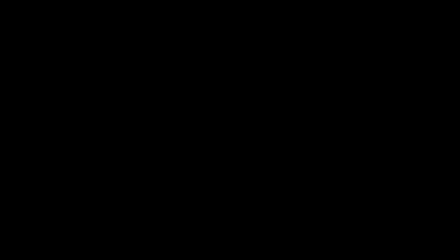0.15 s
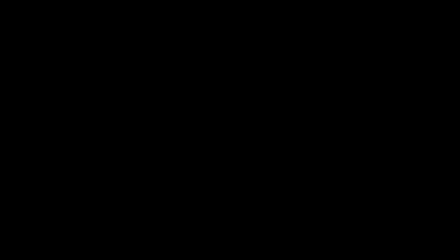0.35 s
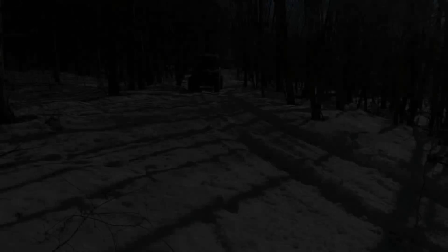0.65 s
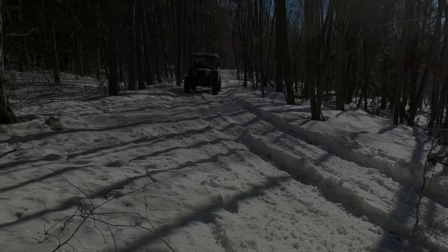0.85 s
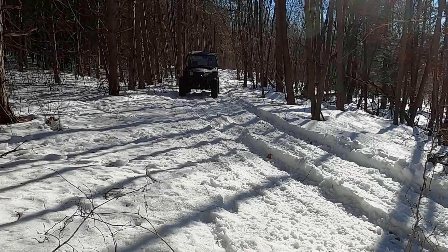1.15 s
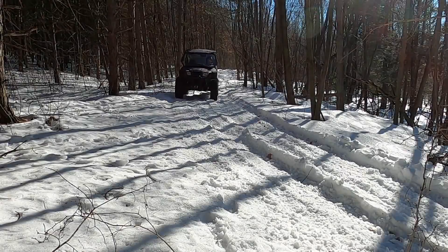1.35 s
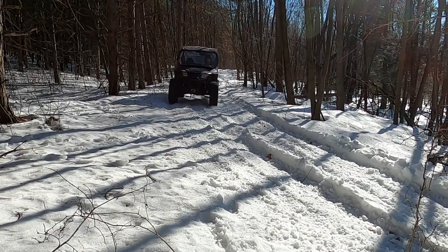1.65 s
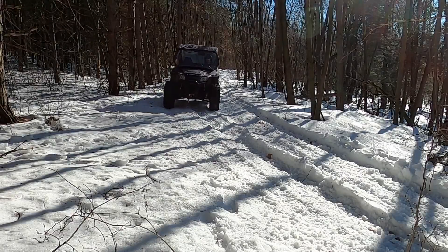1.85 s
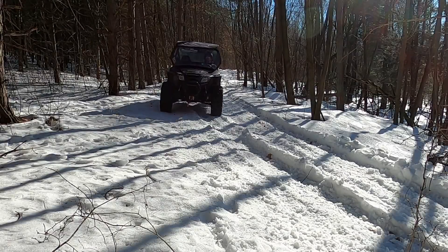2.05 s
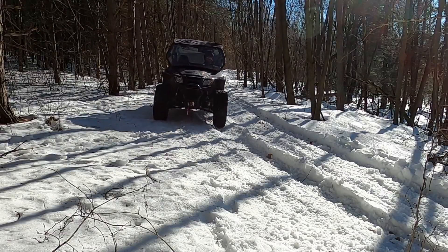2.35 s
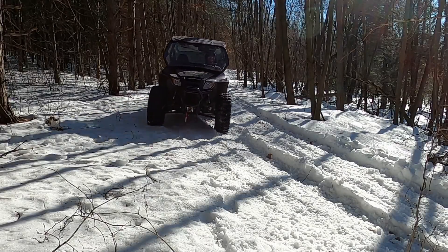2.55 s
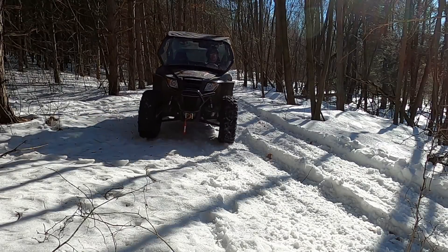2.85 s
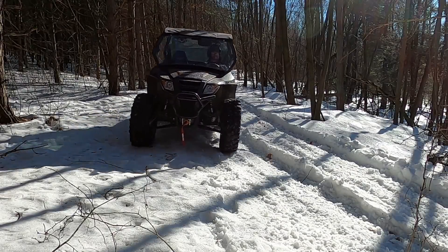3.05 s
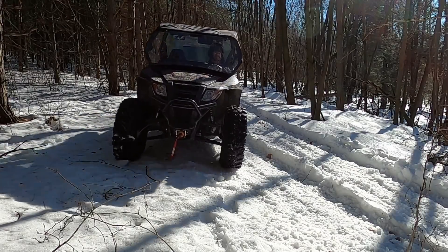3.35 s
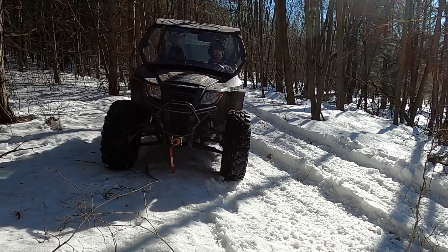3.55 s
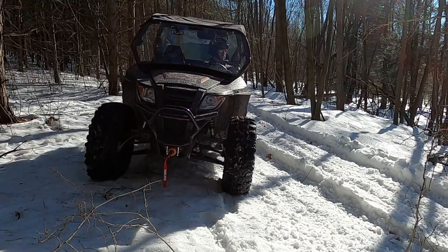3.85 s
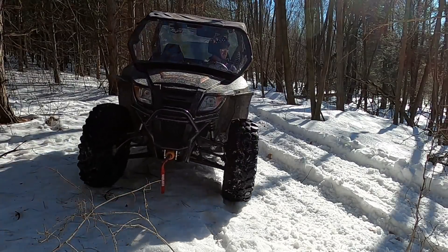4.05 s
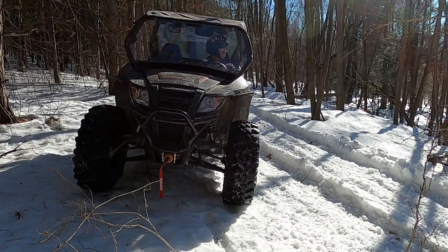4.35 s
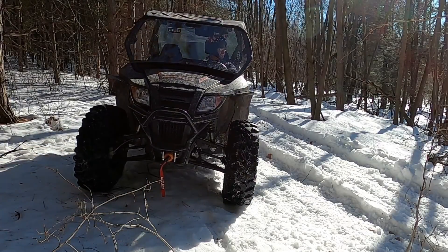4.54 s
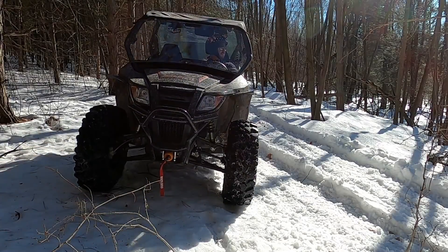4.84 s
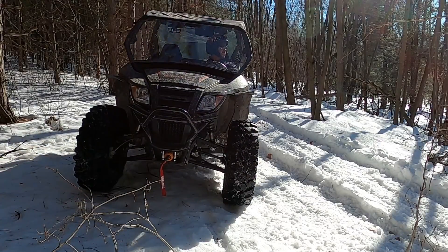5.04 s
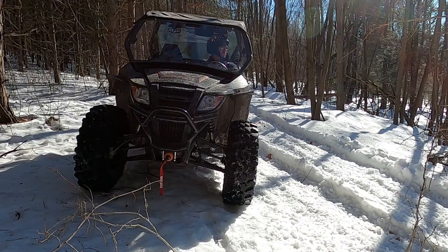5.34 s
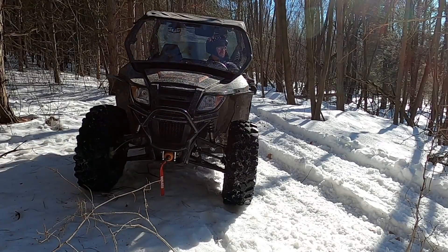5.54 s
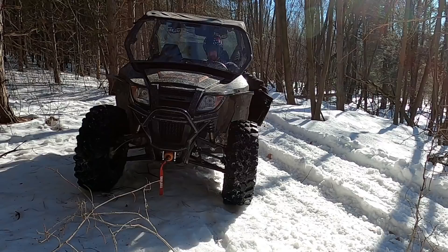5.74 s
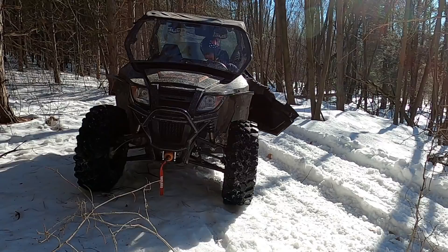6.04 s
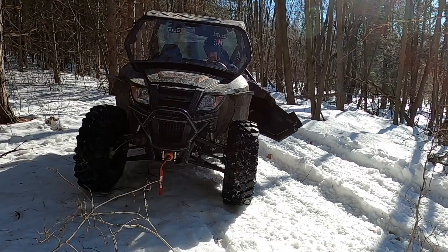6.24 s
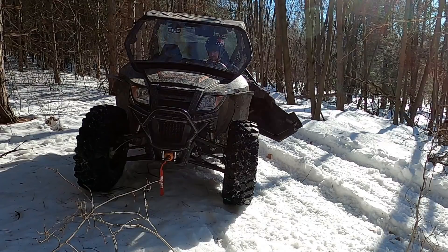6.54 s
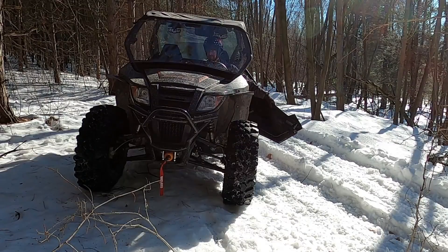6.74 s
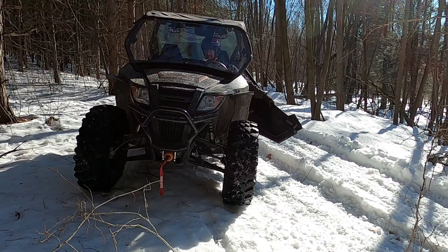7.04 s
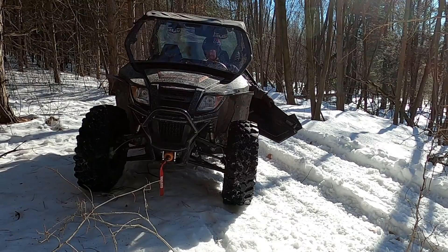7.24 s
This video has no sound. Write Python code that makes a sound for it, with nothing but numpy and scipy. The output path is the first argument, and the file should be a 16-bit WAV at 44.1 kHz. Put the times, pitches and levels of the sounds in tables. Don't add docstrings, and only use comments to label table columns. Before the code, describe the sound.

A two-cylinder off-road vehicle fades in with a fast, low exhaust drone, rolling toward a small fixed microphone on a snowy forest track. Revs drop, snow crunches and crust snaps, exhaust pops burst out as throttle returns. It stops close by and idles in separate, uneven thumps with valve clatter, while a gear lever knocks and a door latch clacks. Bright sounds echo faintly off trees.

```python
import sys
import numpy as np
from scipy import signal
from scipy.fft import rfft, irfft
from scipy.io import wavfile
from scipy.ndimage import uniform_filter1d

SR = 44100
rng = np.random.default_rng(int(sys.argv[2]) if len(sys.argv) > 2 else 0)


def convert_level_to_amplitude(level_db):
    exponent = np.asarray(level_db, float) / 20
    return 10 ** exponent


def waveform_to_disk(signal):
    frames = np.transpose(np.atleast_2d(signal))
    scaled = np.clip(frames, -1, 1) * 32767
    samples = np.round(scaled).astype(np.int16)
    wavfile.write(sys.argv[1], SR, samples)


N = 325899
T = np.arange(N) / SR

# [t/s, firing pairs/(1/s)]
ENGINE_SPEED = [(0.0, 64.42), (0.88, 65.06), (1.06, 67.6), (1.6, 65.23), (1.85, 52.83), (2.28, 44.03),
                (2.75, 34.55), (2.77, 39.45), (3.04, 39.23), (3.54, 35.92), (4.02, 24.29), (4.31, 21.97),
                (4.67, 23.62), (5.13, 22.47), (5.56, 23.78), (6.05, 22.65), (6.65, 23.09), (7.39, 22.6)]
# [t/s, opening 0-1]
THROTTLE = [(0, 0.54), (.8, 0.86), (1.1, 0.48), (1.55, 0.65), (1.75, .02), (2.5, 0.3), (2.8, 0.79),
            (3.1, 0.99), (3.5, 0.96), (3.9, 0.42), (4.4, 0.31), (7.39, 0.29)]
# [t/s, distance/m]
DISTANCE = [(0, 66), (1.6, 29.5), (2.3, 4.2), (3, 3), (4.1, 4.72), (7.39, 3.8)]
# [f/Hz, level/dB]
SILENCER = [(35, -24), (52, -22), (68, -24.5), (105, -24.5), (131, -17.5), (154, -36.5), (197, -23.5),
            (260, -50.5)]
# [multiple, level/dB, gain at full throttle/dB]
LOW_ORDERS = [(1, 2.2, -2.5), (2, 3.04, -5), (3, -6.5, -4.5), (4, -15.5, 24.5)]
# [multiple, level/dB]
UPPER_ORDERS = [(5, -1.5), (6, -10), (7, -11.5), (8, -3), (9, -7), (10, -6.5), (11, -8), (12, -10)]
# [f/Hz, level/dB]
BLOCK_COLOUR = [(160, -3), (280, -6.5), (343, -9), (419, -6.5), (570, -4.5), (729, -17.5), (806, -23),
                (1250, -30.5), (1610, -31.5), (1810, -36), (2140, -31.5), (2700, -40), (5950, -50.5),
                (15500, -76)]
# [f/Hz, width/Hz, level/dB]
COVERS = [(880, 19, -3.5), (1590, 36, -0.5), (1980, 150, -12.5), (3600, 160, -16.5), (4120, 90, -18.5)]
# [t/s, crunch/dB, chassis jolt/dB, half length/s]
RUTS = [(0.18, 4, -5, 0.21), (2.287, -2, -11, 0.14), (0.637, 4, 10.5, 0.11), (1.075, 2, 7.5, 0.13),
        (1.48, 2.5, 3.5, 0.19), (1.787, 7.5, 5.5, 0.058), (1.949, 5, -2, 0.056), (2.44, 2.5, 3, 0.027),
        (2.602, 4, 8.5, 0.019), (2.77, 2, 1, 0.053), (3.028, 2, -0.5, 0.079), (3.4, 2, 3.5, 0.14),
        (3.553, 7, 2, 0.017), (3.599, 5, 19, 0.035), (3.868, 6.5, -2, 0.02), (4.19, 0, 4, 0.027)]
# [f/Hz, level/dB]
SNOW_COLOUR = [(190, -34.5), (320, -1.5), (496, -6.5), (556, -2), (781, -8.5), (1030, -6), (1340, -9.5),
               (1620, -7), (2730, -11), (3710, -13), (7960, -23.5), (9990, -29.5), (11400, -39),
               (12500, -34), (15500, -49)]
# [t/s, peak level/dB, centre f/Hz]
SNAPS = [(1.77, -18.5, 2430), (1.7974, -30, 1100), (2.587, -33, 1900), (2.6943, -28.5, 1680),
         (2.978, -21.5, 2200), (3.023, -21.5, 2160), (3.057, -30, 1680), (3.1076, -24.5, 980),
         (2.039, -27.5, 653), (1.09, -28.5, 560), (.965, -29.5, 520), (1.2, -30, 560), (2.6, -28, 600),
         (3.1448, -36, 1900), (3.5553, -15.5, 2050), (3.5647, -25.5, 2010), (3.5998, -24, 1090),
         (3.6064, -41, 947), (3.6188, -27.5, 1510), (3.09, -30, 2000), (4.3266, -31.5, 1060),
         (4.3505, -35.5, 964), (4.3824, -45, 920)]
# [f/Hz, t60/s, swing from first cylinder, swing from second]
PIPE_MODES = [(38.4, 0.12, 0.082, 0.17), (69.4, 0.06, -0.45, -0.32), (129.4, 0.18, 0.19, 0.11),
              (152.9, 0.13, -0.087, -0.041), (175.3, 0.041, 0.17, -0.032), (241.3, 0.078, 0.0032, 0.0023),
              (254.6, 0.023, 0.038, .008), (365, 0.015, 0.0024, 0.031), (390, 0.021, -0.026, -0.00067)]
# [t/s, level/dB]
POPS = [
    (2.704, -6),
    (2.754, -2),
    (2.777, -10),
    (2.831, -10.5),
    (2.981, -5.5),
    (3.739, -4.5),
]
# [t/s, share of the blow left]
MISSES = [(3.927, .02), (4.173, .05), (5.045, 0.16), (5.223, 0.24), (5.567, .4), (5.694, 0.21),
          (5.865, 0.2), (6.041, 0.42), (6.348, 0.097), (6.523, 0.19), (6.695, 0.16), (7.35, 0.5)]
# [t/s, peak level/dB]
LEVER_KNOCKS = [
    (4.311, -24),
    (4.581, -36),
    (4.746, -47.5),
]
# [f/Hz, level/dB, t60/s]
LEVER_MODES = [(430, -3, .07), (600, -3, .06), (760, 0, .04), (880, -1, .035), (1030, -1, .035),
               (1200, -5, .03)]
# [t/s, peak level/dB, low thud/dB, handle share against striker, brightest f/Hz]
LATCH_CLACKS = [
    (5.266, -48.5, 0, .6, 4590),
    (5.348, -31, -1.5, 0.7, 3270),
    (5.518, -66, -14, 0.84, 6600),
    (5.744, -47, -31, 0.089, 7400),
    (5.771, -31, -15, 0.079, 3810),
    (6.192, -52.5, 6.5, .3, 2200),
    (6.6, -57, -1, 0.44, 4000),
    (6.808, -46.5, -2.5, 0.21, 2470),
]
# [f/Hz, level/dB]
DOOR_COLOUR = [(470, -33), (800, 2), (1180, -7.5), (2410, -7), (2790, -14), (3490, -1), (4910, -15.5),
               (8640, -28.5), (15000, -52)]
# [f/Hz, width/Hz, level/dB]
HANDLE = [(1550, 700, 9), (2950, 1200, 5.5), (3660, 160, 5.5), (7140, 520, 3), (7600, 300, 5.5),
          (8510, 200, 12.5), (12000, 900, 0)]
# [f/Hz, width/Hz, level/dB]
STRIKER = [(1400, 760, 6.5), (2200, 330, 13), (3100, 900, -1.5), (4060, 300, 2.5), (5560, 1200, 0.5),
           (8200, 900, -10.5)]

START_PAIRS = 0.29
ORDERS_DB, UPPER_DB, UPPER_LOAD_DB, WAVER_DB = -2, -53, 10.5, 0.8
SMEAR = 0.45
LOPE_SHUT, LOPE_OPEN, THIRD_LAG = 0.9, 3.4, 0.9
BLOW_LOAD_DB, SHARP_LOAD_DB, EVENING = -1, 8.5, 0.25
IDLE_DB, SECOND_SHARE, IDLE_FROM_S, SETTLE_S = -19, 0.94, 3.58, 0.072
BLOCK_DB, BLOCK_LOAD_DB = -47.5, 5
RUMBLE_DB, RUMBLE_NEAR = -36.5, 0.2
CRUNCH_DB, CRUNCH_NEAR, STOP_S, SKID_S = -48, 0.017, 4.498, 0.32
NEAR_M, AIR_DB_PER_OCTAVE_M = 8.6, 0.04
RATTLE_T60_S = 0.27
FADE_LEAD_S, FADE_S = 0.21, 1.416


def evened(x):
    return x / np.sqrt(np.mean(x ** 2) + 1e-20)


def curve(rows):
    rows = np.array(rows)
    return np.interp(T, rows[:, 0], rows[:, 1])


def add(mix, s, sound):
    part = mix[round(s * SR):][:len(sound)]
    part += sound[:len(part)]


def coloured(x, points):
    f, db = np.transpose(points)
    hz = np.fft.rfftfreq(len(x), 1 / SR)
    gain_db = np.interp(np.log(hz + 1), np.log(f + 1), db)
    return irfft(rfft(x) * convert_level_to_amplitude(gain_db), len(x))


def ring(hz, t60, size=8000):
    t = np.arange(size) / SR
    return convert_level_to_amplitude(-60 * t / t60) * np.sin(2 * np.pi * hz * t)


def resonate(x, hz, width):
    return signal.lfilter(*signal.iirpeak(hz, hz / width, SR), x)


def resonate_twice(x, hz, width):
    return resonate(resonate(x, hz, width), hz, width)


def drift(seconds):
    size = round(seconds * SR)
    return evened(uniform_filter1d(uniform_filter1d(rng.standard_normal(N), size), size))


def nearness():
    return 20 * np.log10(DISTANCE[-1][1] / curve(DISTANCE))


def ruts(column):
    return sum(row[column] * np.exp(-((T - row[0]) / row[3]) ** 2) for row in RUTS)


def rolling():
    return np.clip((STOP_S - T) / SKID_S, 0, 1)


def idling():
    return np.clip((T - IDLE_FROM_S) / SETTLE_S, 0, 1)


def crank():
    return START_PAIRS + np.cumsum(curve(ENGINE_SPEED)) / SR


def crank_orders(pairs):
    angle, hz, load = 2 * np.pi * (pairs - 0.5), curve(ENGINE_SPEED), curve(THROTTLE)
    f, through = np.transpose(SILENCER)
    lope = LOPE_SHUT + (LOPE_OPEN - LOPE_SHUT) * np.sqrt(load)
    low = 0
    for (k, db, load_db), shift in zip(LOW_ORDERS, [lope, 0, -THIRD_LAG, 0]):
        silencer_db = np.interp(np.log(k * hz), np.log(f), through)
        level_db = db + load * load_db + silencer_db + WAVER_DB * drift(0.012)
        low = low + convert_level_to_amplitude(level_db) * np.cos(k * angle + shift)
    high = 0
    for k, db in UPPER_ORDERS:
        silencer_db = -np.clip(k * hz - 540, 0, None) / 14
        level_db = db * (1 - EVENING * load ** 2) + silencer_db + 4 * (1 - load) * drift(0.05)
        high = high + convert_level_to_amplitude(level_db) * np.cos(k * angle - SMEAR * k ** 2)
    whine = np.clip((hz - 56) / 6, 0, 1) * convert_level_to_amplitude(-12 + 3 * drift(0.04))
    whine = whine * np.cos(16 * angle + 1.3 * drift(0.015))
    settling = np.clip((4.25 - T) / 0.17, 0, 1)
    low = (1 - idling()) * convert_level_to_amplitude(ORDERS_DB) * low
    high = settling * convert_level_to_amplitude(UPPER_DB + UPPER_LOAD_DB * load) * (high + whine)
    return np.sqrt(2) * (low + high)


def block(pairs):
    puff = 0.57 + uniform_filter1d(np.exp(-((pairs - 0.3) % 1) / 1.2), size=200)
    ticks = 1 + 0.35 * np.exp(-((4 * pairs) % 1) / 0.11) + 0.083 * puff
    air = convert_level_to_amplitude(1.1 * drift(0.032)) * rng.standard_normal(N)
    low = signal.sosfilt(signal.butter(2, 600, fs=SR, output="sos"), evened(puff * air))
    high = signal.sosfilt(signal.butter(2, 600, "high", fs=SR, output="sos"), evened(ticks * air))
    body = coloured(low + high, BLOCK_COLOUR)
    body /= np.std(resonate(body, 450, 320))
    covers = sum(convert_level_to_amplitude(db + 5.8 * drift(0.04)) * resonate(high, hz, width) for hz, width, db in COVERS)
    level_db = BLOCK_DB + nearness() + BLOCK_LOAD_DB * curve(THROTTLE)
    return convert_level_to_amplitude(level_db) * (body + convert_level_to_amplitude(-6.0) * covers)


def chassis():
    colour = [(14, -32), (32, 2), (150, 4.5), (250, -2), (400, -61)]
    rumble = evened(coloured(rng.standard_normal(N), colour))
    return convert_level_to_amplitude(RUMBLE_DB + RUMBLE_NEAR * nearness() + ruts(column=2)) * rolling() * rumble


def tyres():
    clumps = convert_level_to_amplitude(1.17 * drift(0.012))
    struck = rng.random(N) < 2500 / SR
    strength = convert_level_to_amplitude(3.0 * np.minimum(rng.exponential(1, N), 5))
    breaks = struck * strength * rng.choice([-1, 1], N)
    hiss = rng.standard_normal(N)
    crunch = coloured(clumps * (0.53 * evened(breaks) + 0.93 * hiss), SNOW_COLOUR)
    band = signal.sosfilt(signal.butter(2, [1500, 9000], "band", fs=SR, output="sos"), crunch)
    hz, t, z = signal.stft(crunch / np.std(band), SR, nperseg=512)
    octaves = np.log2(np.clip(hz, 700, None) / 2500)[:, None]
    tilt_db = AIR_DB_PER_OCTAVE_M * (NEAR_M - np.interp(t, *np.transpose(DISTANCE))) * octaves
    out = signal.istft(z * convert_level_to_amplitude(tilt_db), SR, nperseg=512)[1][:N]
    return out * convert_level_to_amplitude(CRUNCH_DB + CRUNCH_NEAR * nearness() + ruts(column=1)) * rolling()


def forest(x):
    taps = np.zeros(SR // 2)
    at = np.arange(500, len(taps) - 30, 30)
    taps[at + rng.integers(0, 30, len(at))] = rng.choice([-1., 1.], len(at))
    taps *= convert_level_to_amplitude(-60 * np.arange(len(taps)) / SR / 0.35)
    return signal.oaconvolve(x, taps / np.linalg.norm(taps))[:N]


def snaps():
    out, t = np.zeros(N), np.arange(2000) / SR
    envelope = np.minimum(t / 0.00063, 1) * convert_level_to_amplitude(-60 * t / 0.022)
    for s, db, hz in SNAPS:
        noise = rng.standard_normal(len(t))
        grit = resonate_twice(noise, 3300, 5000)
        snap = (resonate_twice(noise, hz, 900) + 0.22 * grit) * envelope
        add(out, s, convert_level_to_amplitude(db - 6.5) * snap / abs(snap).max())
    return out


def pops():
    out = np.zeros(N)
    pop = sum(swing * ring(hz, 0.5 * t60) for hz, t60, swing, _ in PIPE_MODES)
    for s, db in POPS:
        add(out, s, convert_level_to_amplitude(db) * pop)
    return out


def idle_blows(pairs):
    uneven, load = 1 + 0.12 * rng.standard_normal((2, N)), curve(THROTTLE)
    first = np.diff(np.floor(pairs - 0.272), prepend=-1) * uneven[0]
    second = np.diff(np.floor(pairs - 0.75), prepend=-1) * uneven[1]
    second = second * (SECOND_SHARE + (1 - SECOND_SHARE) * load)
    for s, left in MISSES:
        first = first * np.where(abs(T - s) < 0.014, left, 1)
    sharp, out = convert_level_to_amplitude(SHARP_LOAD_DB * load), 0
    for hz, t60, swing, swing_second in PIPE_MODES:
        drive = (swing * first + swing_second * second) * (sharp if hz > 100 else 1)
        out = out + signal.oaconvolve(drive, ring(hz, t60, size=16000))[:N]
    out = uniform_filter1d(out, size=70)
    level = np.sqrt(uniform_filter1d(uniform_filter1d(out ** 2, size=16000), size=16000))
    return idling() * convert_level_to_amplitude(IDLE_DB + BLOW_LOAD_DB * load) * out / level


def gear_lever():
    out, t = np.zeros(N), np.arange(8000) / SR
    for s, db in LEVER_KNOCKS:
        tune = rng.uniform(0.88, 1.037, len(LEVER_MODES))
        knock = sum(convert_level_to_amplitude(d) * ring(f * k, t60) for (f, d, t60), k in zip(LEVER_MODES, tune))
        add(out, s, convert_level_to_amplitude(db - 4.5) * np.minimum(t / 0.0013, 1) * knock)
    return out


def door_latch():
    out, t = np.zeros(N), np.arange(8000) / SR
    thud = ring(587, 0.07) + 0.7 * ring(450, 0.07) + 0.6 * ring(780, 0.04) + 0.4 * ring(1000, 0.03)
    for s, db, thud_db, share, hz in LATCH_CLACKS:
        tail = 0.12 * convert_level_to_amplitude(-60 * t / (RATTLE_T60_S * max(share, 0.2)))
        shake = rng.standard_normal(len(t)) * np.minimum(t / 0.006, 1) * (convert_level_to_amplitude(-60 * t / 0.06) + tail)
        handle = sum(convert_level_to_amplitude(d) * resonate(shake, f, w) for f, w, d in HANDLE)
        striker = sum(convert_level_to_amplitude(d) * resonate(shake, f, w) for f, w, d in STRIKER)
        clack = share * handle + (1 - share) * striker + 0.42 * coloured(shake, DOOR_COLOUR)
        clack = resonate_twice(clack, hz, 1.4 * hz)
        add(out, s, convert_level_to_amplitude(db) * clack / abs(clack).max())
        add(out, s + 0.006, convert_level_to_amplitude(db + thud_db) * thud)
    return out


def scene():
    pairs = crank()
    engine = crank_orders(pairs) + block(pairs) + pops() + idle_blows(pairs)
    bright = tyres() + snaps() + gear_lever() + door_latch()
    return (engine + chassis() + bright + convert_level_to_amplitude(-11.5) * forest(bright))[None]


def low_pass(x):
    return signal.sosfilt(signal.butter(12, 15640, fs=SR, output="sos"), x)


def record(dry):
    dry = dry * np.clip((T + FADE_LEAD_S) / FADE_S, 0, 1)
    mix = signal.sosfiltfilt(signal.butter(2, 17, "high", fs=SR, output="sos"), dry)
    return low_pass(mix)


dry = scene()
out = record(dry)
waveform_to_disk(out)
```